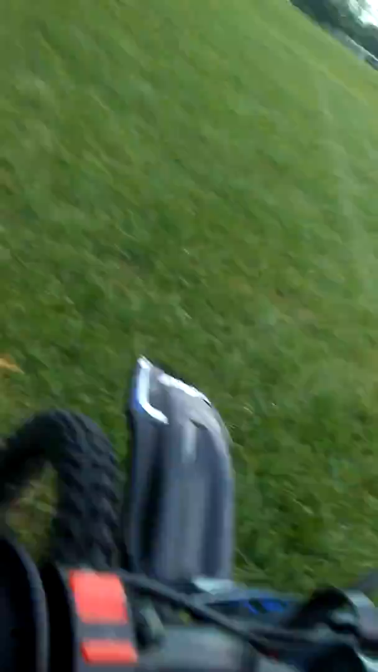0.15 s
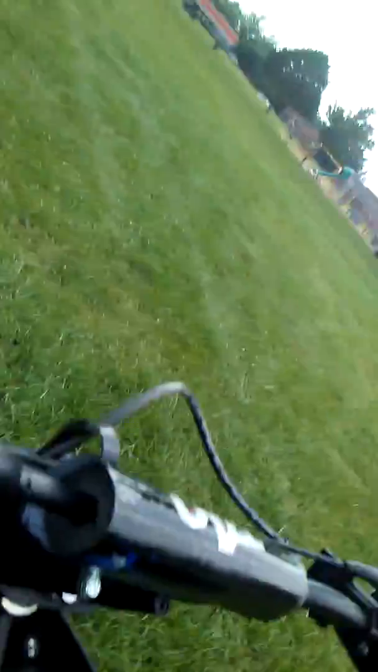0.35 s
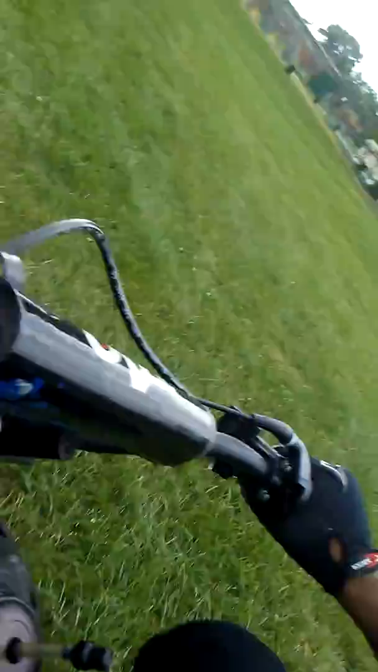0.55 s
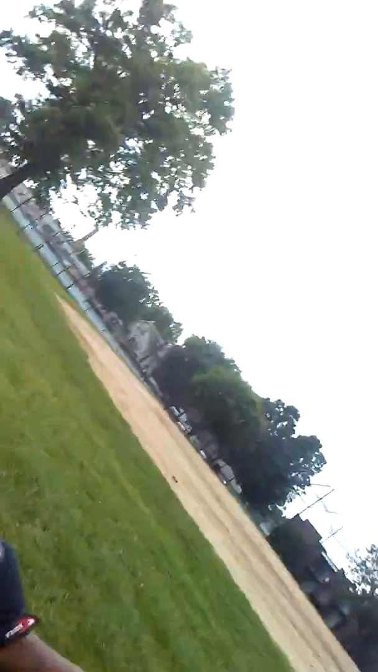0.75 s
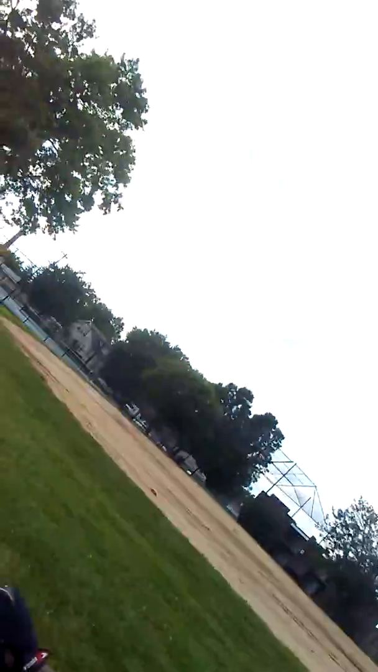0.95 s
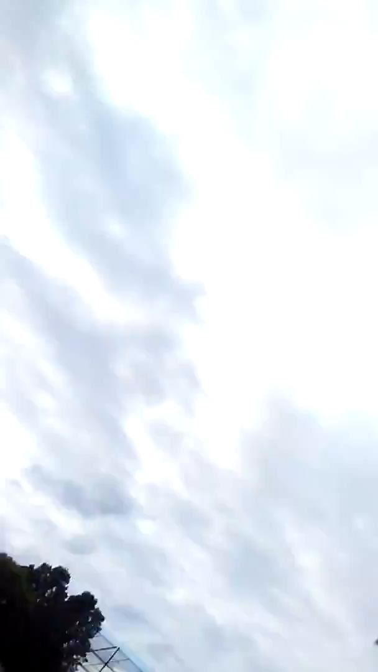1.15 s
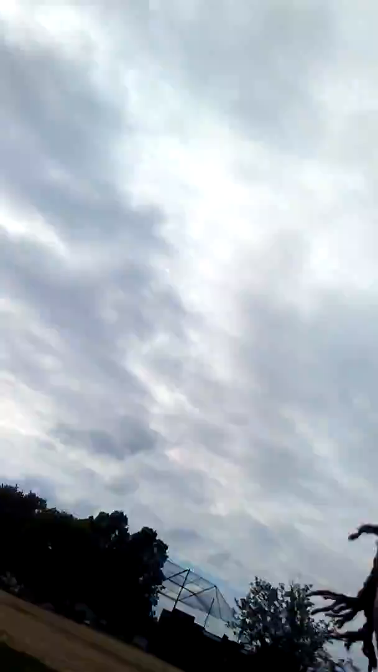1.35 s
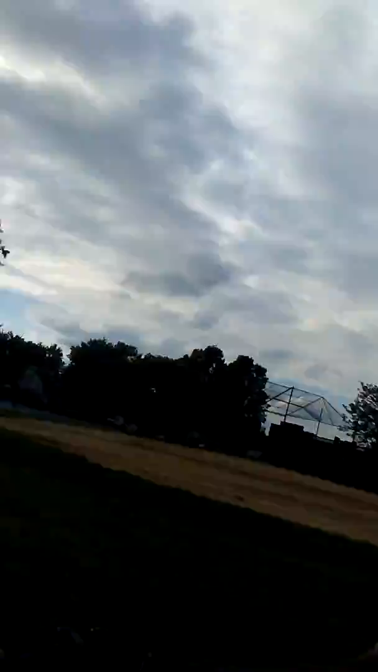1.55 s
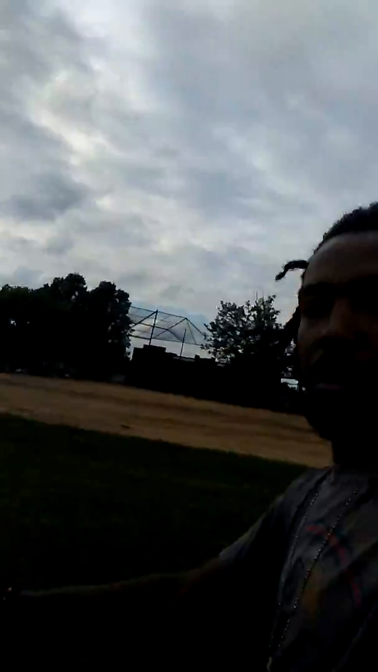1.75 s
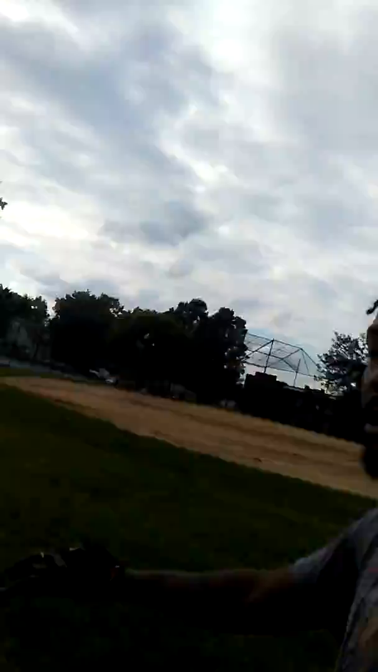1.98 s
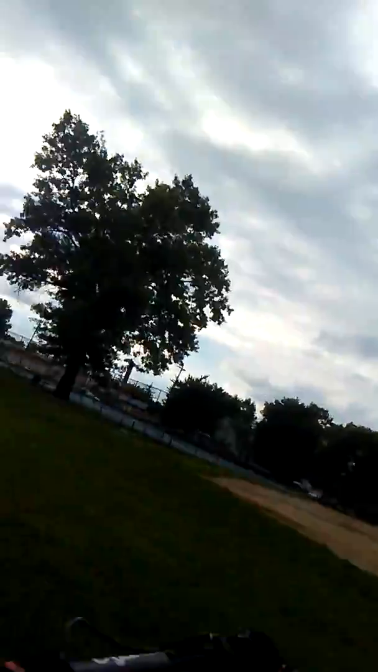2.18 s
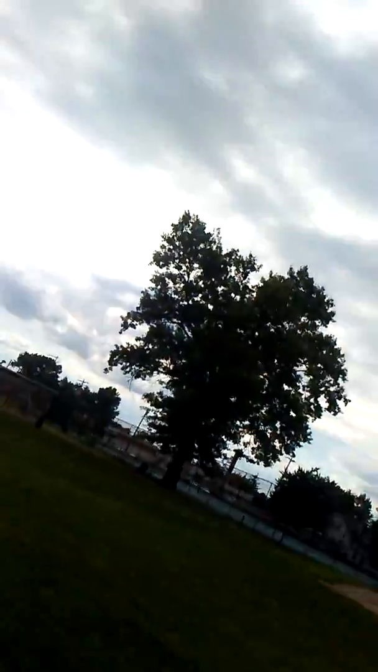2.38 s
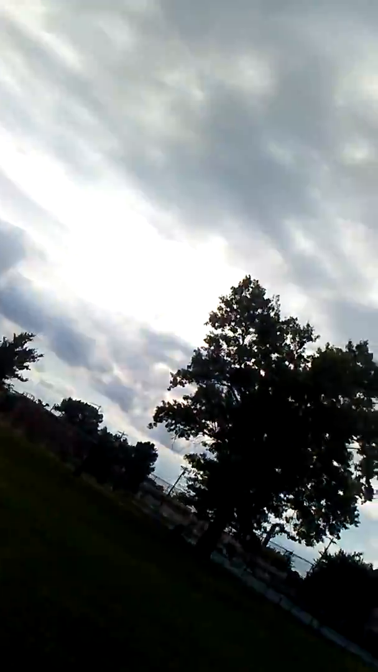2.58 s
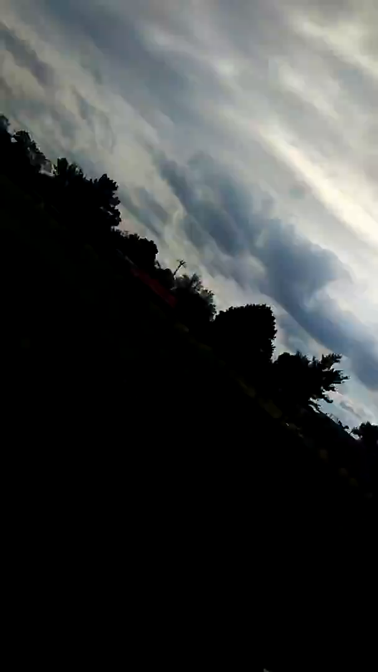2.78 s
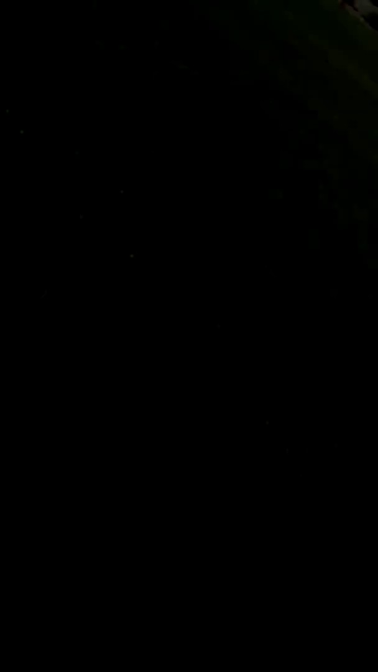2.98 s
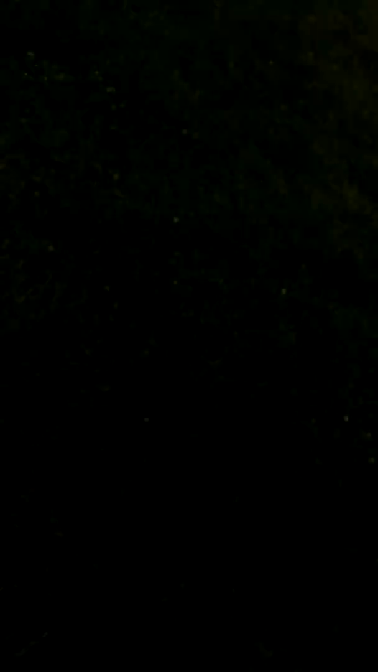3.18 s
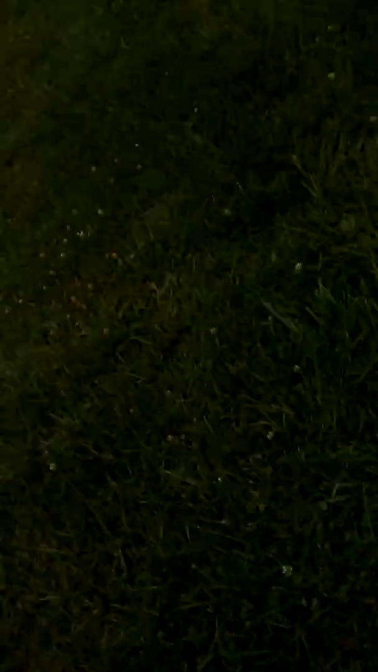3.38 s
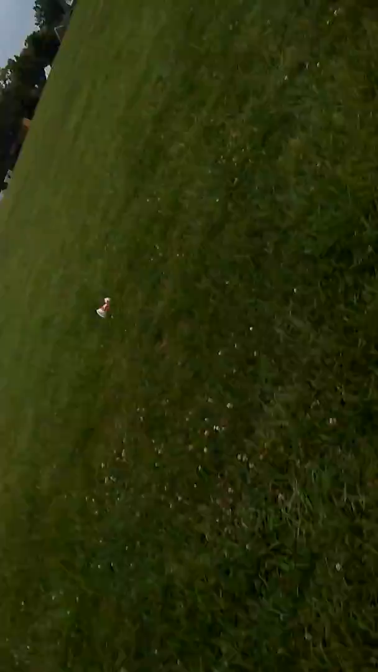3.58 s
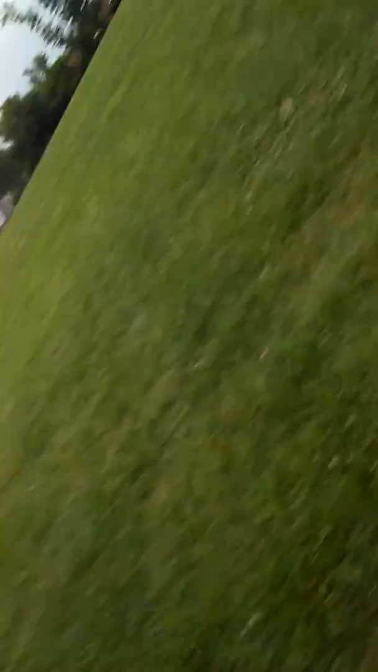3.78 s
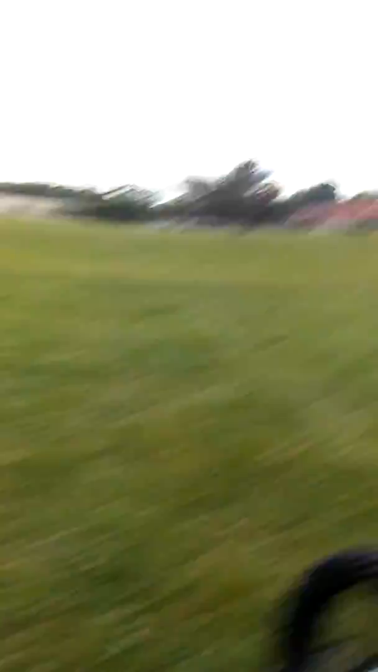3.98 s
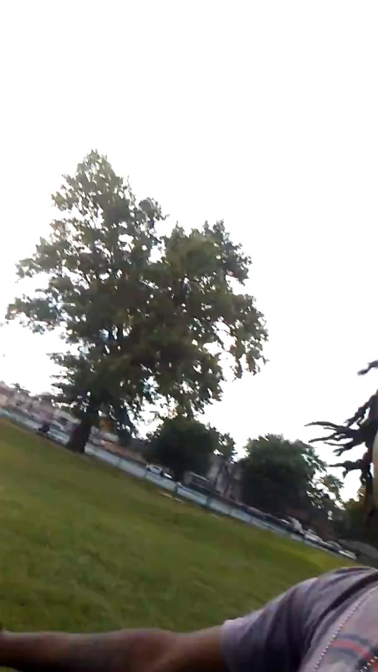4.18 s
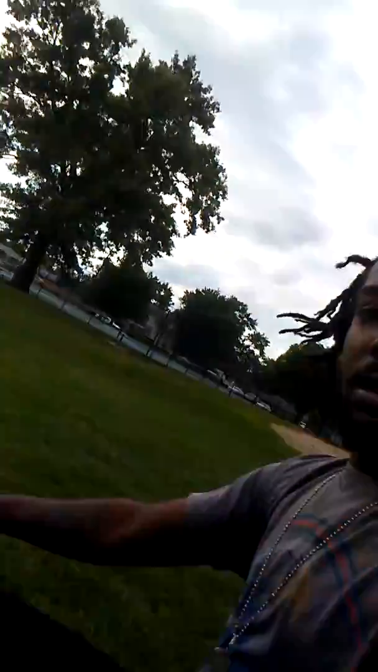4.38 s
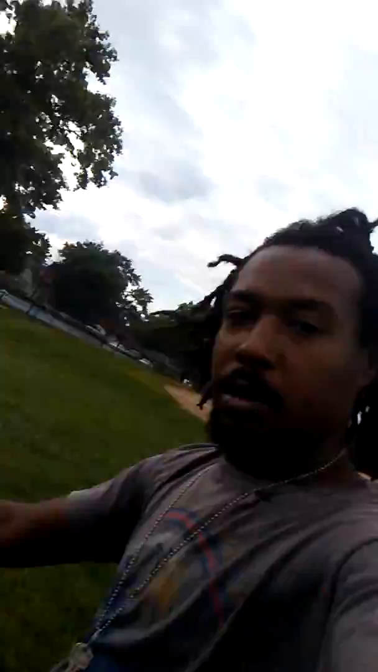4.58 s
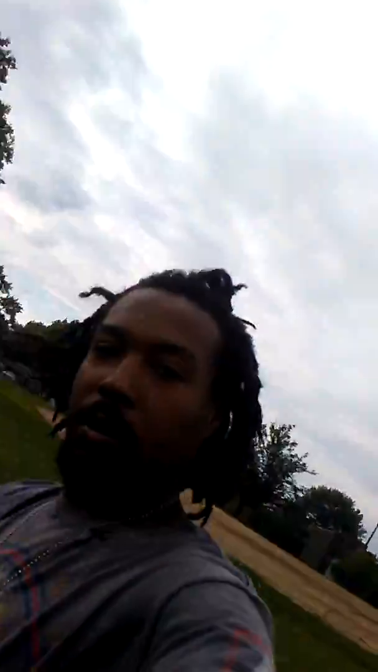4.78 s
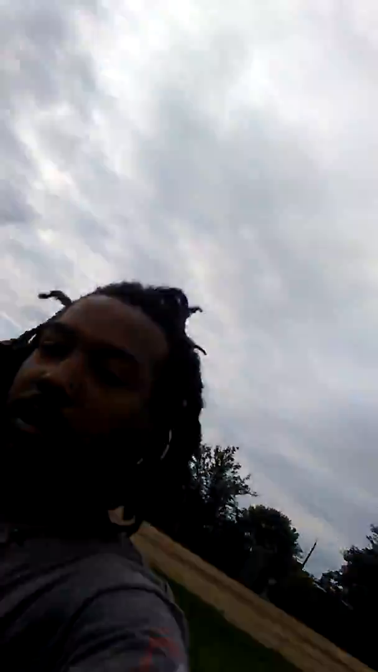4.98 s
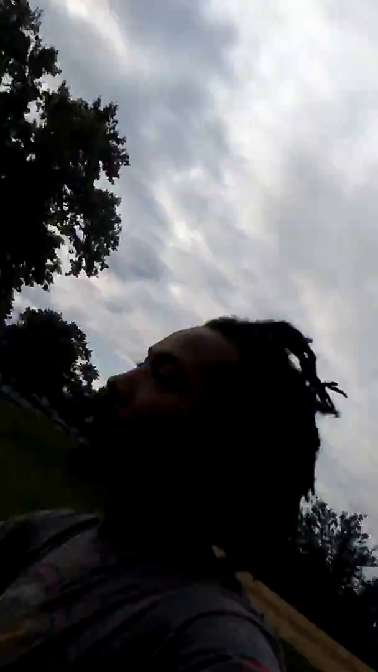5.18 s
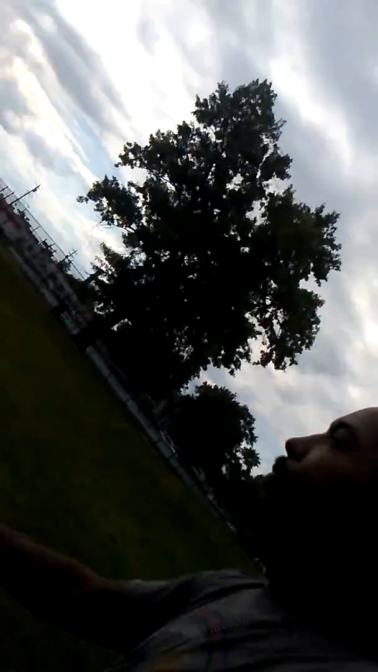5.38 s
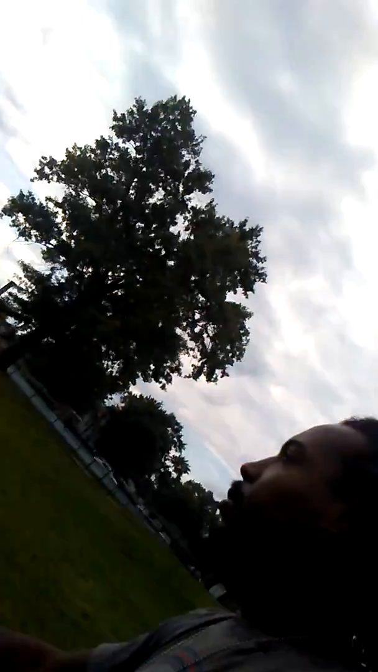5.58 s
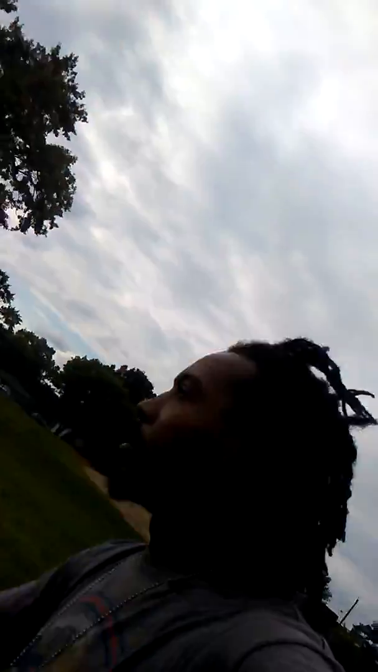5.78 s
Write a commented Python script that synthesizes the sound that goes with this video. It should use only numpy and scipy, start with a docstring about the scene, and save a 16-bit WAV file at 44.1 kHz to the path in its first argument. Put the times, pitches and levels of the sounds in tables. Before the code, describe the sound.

A single-cylinder quad bike chugs near idle, then picks up speed across a grass field, with handling knocks and growing wind gusts on the microphone.

```python
"""A single-cylinder four-stroke quad bike crosses a grass field, heard from the rider's hand.
It chugs near idle, then picks up speed: each firing excites the odd quarter-wave notes of the exhaust pipe.
Gas turbulence follows each puff, the intake hisses between firings, the casing clatters and the chain rasps.
Wind gusts rumble on the microphone, and the hand scuffs and knocks its case.
A fast limiter flattens the beats, and a faint modulated buzz rides on everything."""
import sys
import numpy as np
from scipy import signal
from scipy.fft import rfft, irfft, next_fast_len
from scipy.io import wavfile
from scipy.ndimage import uniform_filter1d

SR = 44100
rng = np.random.default_rng(int(sys.argv[2]) if len(sys.argv) > 2 else 0)


def transcribe(u):
    """Save the signal u as a 16-bit wav file named by the first command-line argument.

    u: samples, shape (n,) or (channels, n), limited to [-1, 1]; the rate is SR.
    q: integer samples, one column per channel.
    """
    v = np.clip(np.atleast_2d(u).T, -1, 1)
    q = np.round(v * 32767).astype(np.int16)
    wavfile.write(sys.argv[1], SR, q)


N = 257588
TIME = np.arange(N) / SR
IDLE_PER_S = 19  # firings per second
FIRST_FIRING_S, START_S = .5166, .527
EDGE_HZ = 15800  # upper band limit


def amp(db):
    """Level law: decibels to an amplitude ratio."""
    return 10 ** (np.asarray(db) / 20)


def evened(x):
    """Power normalisation: scales to rms 1."""
    return x / np.sqrt(np.mean(x ** 2) + 1e-20)


def curves(rows):
    """Linear interpolation: every column of a time table, at each sample."""
    s, *columns = np.transpose(rows)
    return [np.interp(TIME, s, column) for column in columns]


def read(points, hz):
    """Logarithmic pitch axis: a spectrum's value at hz, interpolated over log frequency."""
    f, value = np.transpose(points)
    return np.interp(np.log(hz + 1), np.log(f), value)


def add(mix, s, sound):
    """Superposition: mixes a sound in at s seconds."""
    part = mix[max(round(s * SR), 0):][:len(sound)]
    part += sound[:len(part)]


def coloured(x, points):
    """Linear filtering: multiplies the spectrum of x by a gain curve, then scales to rms 1."""
    size = next_fast_len(N)
    gain = amp(read(points, np.fft.rfftfreq(size, 1 / SR)))
    return evened(irfft(rfft(x, size) * gain, size)[:N])


def wander(hz):
    """Low-passed noise: a slow random drift of rms 1, with a Gaussian roll-off around hz."""
    size = next_fast_len(N)
    f = np.fft.rfftfreq(size, 1 / SR)
    return evened(irfft(rfft(rng.standard_normal(size)) * np.exp(-(f / hz) ** 2), size)[:N])


def grainy(rough_db, grain_hz):
    """Random amplitude modulation: white noise that comes in clumps."""
    return evened(rng.standard_normal(N) * amp(rough_db * wander(grain_hz)))


def stroke(turns, centre, width):
    """Cyclic excitation: a bump once per engine cycle; centre and width in cycles after the firing."""
    phase = (turns - centre + .5) % 1 - .5
    return np.exp(-.5 * (phase / width) ** 2)


def swell(s, length):
    """Gaussian envelope: a smooth rise and fall around s seconds."""
    return np.exp(-(2 * (TIME - s) / length) ** 2)


def octaves(speed):
    """Logarithmic speed: engine speed in octaves above idle."""
    return np.log2(speed / IDLE_PER_S)


def resonate(x, hz, width):
    """Heterodyne resonance: a two-pole low-pass, shifted to follow the curve hz; rms 1."""
    turn = np.exp(2j * np.pi * np.cumsum(hz) / SR)
    r = np.exp(-np.pi * width / SR)
    return evened((turn * signal.lfilter([1], np.poly([r, r]), x / turn)).real)


def air(points, centre_hz, width, focus):
    """Turbulent noise: broad hiss with one moving resonance standing out of it."""
    broad = coloured(grainy(rough_db=3.5, grain_hz=410), points)
    narrow = resonate(grainy(rough_db=6.5, grain_hz=197), centre_hz, width)
    return evened(broad + focus * narrow)


def exhaust(turns, speed, echo_s=0.004322, hot_echo_s=0.004026, reflection=0.88, hot_reflection=0.85,
            wall_hz=580, sweep=0.44, bloom_s=0.00436, bloom_hz=400, valve_hz=1200, bark_db=-9.0,
            bark_rev_db=-3.7, uneven_db=0.44, scatter_db=0.1, size=8192):
    """Quarter-wave resonance: each puff runs up and down the pipe, flipping at the open end."""
    # One puff through the muffler with its chamber resonances. Each row: frequency in Hz, relative level in dB.
    puff_colour = [(25, -20), (70, 36.5), (120, 41.5), (190, 41.5), (270, 52.5), (345, 43), (420, 55.5),
                   (510, 28.5), (620, 36.5), (730, 33), (860, 35.5), (1150, 25.5), (2000, -18.5),
                   (5000, -14)]
    # Pipe's lowest note, changing as the hand moves about. Each row: time in seconds, relative level in dB.
    boom = [(.53, -2), (1.0, 1), (1.45, -1.2), (1.75, -9), (2.15, -5.5), (2.6, -8), (3.0, 1), (3.3, 2.5),
            (3.6, -1.5), (4.7, 4), (5.5, 1), (5.84, 4.5)]
    # How far the muffler's honk stands out. Each row: time in seconds, level in dB before its share.
    honk_level = [(.53, 1.5), (1.75, -10), (2.2, -3.5), (3.0, -5), (3.65, 9.5), (4.0, 5), (5.1, -4.5),
                  (5.84, 11)]
    # Resonances of the honk. Each row: centre in Hz, half-width in Hz, multiplier of the honk level in dB.
    honk_modes = [(716, 17, 1.57), (884, 67, 1.54)]
    hz, out = np.fft.rfftfreq(size, 1 / SR), np.zeros(N)
    (boom_db,), (honk_db,) = curves(boom), curves(honk_level)
    revs = (speed - speed.min()) / np.ptp(speed)  # 0 slowest, 1 fastest
    firings = np.flatnonzero((np.diff(np.floor(turns)) > 0) & (turns[1:] >= 0))
    chance = rng.standard_normal((len(firings), len(puff_colour) + 1))
    upper = hz ** 2 / (hz ** 2 + 200 ** 2)  # weight of the notes above the boom
    honk = sum(share / (1 + ((hz - centre) / width) ** 2) for centre, width, share in honk_modes)
    # The valve lifts gradually, rounding the front
    lead_s = .001
    opening = np.exp(-(hz / valve_hz) ** 2 - 2j * np.pi * hz * lead_s)
    # The muffler holds back the upper notes: each chug sweeps upward
    lag = bloom_s * hz ** 6 / (hz ** 6 + bloom_hz ** 6)
    opening = opening * np.exp(-2j * np.pi * np.cumsum(lag) * hz[1])
    for i, (strength, *scatter) in zip(firings, chance):
        colour = np.add(puff_colour, np.outer(scatter, [0, scatter_db]))  # no two burns are alike
        db = read(colour, hz) + uneven_db * strength + honk_db[i] * honk
        db = db + boom_db[i] * (1 - upper) + (bark_db + bark_rev_db * revs[i]) * upper
        # Minimum phase is causal: the muffler rings after the front
        log_gain = np.log(amp(np.r_[db, db[-2:0:-1]]))
        puff = -np.exp(np.conj(signal.hilbert(log_gain)))[:len(hz)]
        # Hot, fast gas shortens and damps the round trip
        heat = revs[i] ** 3
        delay = echo_s + (hot_echo_s - echo_s) * heat
        back = reflection + (hot_reflection - reflection) * heat
        echo = back * np.exp(-(hz / wall_hz) ** 2 - 2j * np.pi * hz * delay)
        # At low revs the rising piston pushes out a second puff, two round trips later
        second = sweep * (1 - heat) * upper * np.exp(-4j * np.pi * hz * delay)
        add(out, i / SR - lead_s, irfft(opening * puff * (1 + second) / (1 + echo)))
    return out


def intake(turns, snap=0.76, leak=.13, uneven_db=.5):
    """Flow noise: air hisses past the throttle in a spurt as the valve opens, and a peak near full lift."""
    # How strongly the intake gulps once a cycle. Each row: time in seconds, share from 0 to 1.
    throttle = [(.5, 0), (2.5, 0), (3.2, 0.28), (3.6, 0.36), (4.8, 0.62), (5.2, 0.23), (5.8, 0.45)]
    # Level and pitch of the hiss, changing as the hand turns. Each row: time in seconds, level in dB, centre in Hz.
    hiss_band = [(.55, -40, 5600), (1.2, -37, 5600), (1.5, -28, 5430), (1.64, -40.5, 5870),
                 (2.6, -38, 6680), (2.85, -35, 5350), (3.4, -25, 5480), (3.95, -32, 5300),
                 (4.18, -22.5, 6650), (4.3, -31.5, 5850), (4.7, -23, 5680), (5.1, -25.5, 5380),
                 (5.62, -34.5, 5000), (5.84, -24.5, 5270)]
    # Level and pitch of the fizz above it. Each row: time in seconds, level in dB, centre in Hz.
    fizz_band = [(.55, -40, 8300), (.85, -49, 8500), (1.2, -30.5, 9300), (1.5, -35, 9500),
                 (1.85, -31, 9000), (2.15, -39, 8000), (2.8, -31.5, 7300), (3.3, -34.5, 7670),
                 (3.55, -28, 10700), (4.0, -29, 10200), (4.2, -29.5, 8400), (4.75, -24.5, 9450),
                 (5.25, -34.5, 8070), (5.62, -36.5, 8400), (5.84, -27, 8800)]
    # Colour of the hiss. Each row: frequency in Hz, relative level in dB.
    hiss_colour = [(3000, -12), (4300, 10), (5100, 14), (6000, 17), (6900, 13.5), (7700, 4), (9500, -24)]
    # Colour of the fizz. Each row: frequency in Hz, relative level in dB.
    fizz_colour = [(5500, -11.5), (7300, 5), (8400, 9.5), (9600, 4.5), (10800, 2), (12200, 1.5),
                   (13500, -25), (16000, -31)]
    share = np.clip(curves(throttle)[0], 0, 1)
    peaks = stroke(turns, centre=0.4, width=0.044) + stroke(turns, centre=0.69, width=0.078)
    gulp = stroke(turns, centre=0.58, width=0.094) + snap * peaks
    gate = evened(1 - share + share * (leak + gulp * amp(uneven_db * wander(27))))
    gate /= np.sqrt(uniform_filter1d(gate ** 2, size=8000))  # gulping keeps the average power steady
    (hiss_db, hiss_hz), (fizz_db, fizz_hz) = curves(hiss_band), curves(fizz_band)
    hiss = amp(hiss_db) * air(hiss_colour, hiss_hz, width=660, focus=0.77)
    fizz = amp(fizz_db) * air(fizz_colour, fizz_hz, width=1700, focus=0.7)
    return gate * (hiss + fizz)


def clatter(turns, speed, per_octave_db=10, valve=0.33):
    """Forced resonance: valve gear rattles the casing, louder with speed and hardest as the valves seat."""
    # Ringing of the engine casing. Each row: frequency in Hz, bandwidth in Hz, relative level in dB.
    casing = [(1060, 850, 7), (1482, 106, 7), (1754, 42, 7.5), (2225, 260, -2), (1540, 2000, -18)]
    # Clatter at idle speed, lower while the hand is turned away. Each row: time in seconds, level in dB.
    casing_level = [(.55, -32), (1.45, -29.5), (1.8, -36.5), (2.4, -33.5), (2.9, -31), (3.6, -31.5),
                    (5.84, -31)]
    seats = stroke(turns, centre=1.0, width=0.0083) + stroke(turns, centre=0.91, width=0.016)
    drive = grainy(rough_db=3.0, grain_hz=372) * (1 + valve * seats)
    ring = np.zeros(N)
    for hz, width, db in casing:
        ring += amp(db) * signal.lfilter(*signal.iirpeak(hz, hz / width, SR), drive)
    return amp(curves(casing_level)[0] + per_octave_db * octaves(speed)) * evened(ring)


def gas_rush(turns, speed, idle_db=-28.5, per_octave_db=13, between=0.33):
    """Jet noise: turbulence leaves the pipe with each puff, stronger with speed."""
    # Colour of the rush. Each row: frequency in Hz, relative level in dB.
    rush = [(150, -37), (400, 0), (720, -3), (950, -13), (1300, -20), (2500, -35)]
    gate = evened(between + stroke(turns, centre=.25, width=.12))
    level = amp(idle_db + per_octave_db * octaves(speed))
    return level * gate * coloured(rng.standard_normal(N), rush)


def chain(turns, tug=0.59, loose_db=2.5):
    """Friction noise: the chain rasps unevenly, tugged once per engine cycle."""
    # Strength of the rasp. Each row: time in seconds, level in dB.
    rasp_level = [(.85, -47), (1.4, -29), (1.95, -39), (2.4, -32.5), (2.7, -39.5), (3.3, -36), (4.15, -62),
                  (4.35, -29), (4.65, -55), (4.95, -35), (5.84, -32)]
    # Colour of the rasp. Each row: frequency in Hz, relative level in dB.
    rasp = [(1500, -28), (2400, -5.5), (2800, 17), (3150, 10.5), (3600, 7), (4400, 0), (5500, -8.5)]
    pull = 1 + tug * stroke(turns, centre=0.63, width=0.21)
    gate = evened(pull * amp(loose_db * wander(22)))
    return amp(curves(rasp_level)[0]) * gate * coloured(grainy(rough_db=6.0, grain_hz=296), rasp)


def scuffs():
    """Friction noise: short grainy rubs of skin on the microphone's case."""
    # The hand's rubs. Each row: time of the peak in seconds, length in seconds, level in dB.
    rubs = [(0.928, 0.058, -26.5), (1.033, 0.029, -29.5), (1.144, 0.016, -22), (3.07, 0.12, -26),
            (5.801, 0.036, -19.5)]
    # Colour of skin on the case. Each row: frequency in Hz, relative level in dB.
    skin = [(600, -16), (1500, -1), (2800, 3), (5500, -1.5), (8000, -7), (14000, -21)]
    level = sum(amp(db) * swell(s, length) for s, length, db in rubs)
    return level * coloured(grainy(rough_db=6, grain_hz=500), skin)


def knocks(crack=3.3, crack_s=0.0024, size=3000):
    """Impulse response: a tap gives a short noise crack and the decaying modes of the case."""
    # Taps of the hand. Each row: time in seconds, peak in dB ahead of the limiter, ring tilt in dB per octave.
    taps = [(0.5363, -8, -6), (0.551, 1.5, -7), (0.5847, -10.5, 5), (1.326, -7, 36), (1.3525, 9, -3),
            (3.062, 3, 17), (5.5939, 9, 4)]
    # Modes of the case. Each row: frequency in Hz, level in dB before the tilt, time to fall 60 dB in seconds.
    modes = [(1950, -5, 0.0045), (2580, 29, 0.0082), (3370, 22, 0.011), (4100, 23.5, 0.023),
             (4650, 20, 0.011), (7160, 6, 0.0087)]
    t, out = np.arange(size) / SR, np.zeros(N)
    for s, peak_db, treble_db in taps:
        hit = crack * rng.standard_normal(size) * np.exp(-t / crack_s)
        for hz, db, t60 in modes:
            decay = amp(db + treble_db * np.log2(hz / 3000) - 60 * t / t60)
            hit += decay * np.sin(2 * np.pi * hz * t)
        add(out, s, amp(peak_db) * hit / abs(hit).max())
    return out


def wind(speed, rumble_db=-26, rumble_per_octave_db=2, buffet_db=-40, buffet_per_octave_db=30):
    """Turbulent pressure: lumpy eddies on the microphone grow with speed; gusts swell over them."""
    # Colour of the steady rumble. Each row: frequency in Hz, relative level in dB.
    rumble_colour = [(12, -8), (30, -7), (55, 10.5), (90, 11), (200, 0), (600, -31), (2000, -70)]
    # Colour of the buffeting. Each row: frequency in Hz, relative level in dB.
    buffet_colour = [(40, -2), (120, -1.5), (280, 10.5), (450, 10), (600, -8.5), (1000, -15.5), (2500, -58),
                     (6000, -64.5), (16000, -104)]
    # Colour of a gust's low thump. Each row: frequency in Hz, relative level in dB.
    thump_colour = [(15, -19), (35, 4), (55, 3), (90, -0.5), (200, -25), (800, -62)]
    # Gusts. Each row: time of the peak in seconds, length in seconds, thump level in dB,
    # buffeting level in dB, treble tilt of the buffeting in dB per octave.
    gusts = [(4.306, 0.079, -23, -11.5, -4), (4.52, 0.11, -15, -16, -3), (5.144, 0.12, -19, -13.5, 5),
             (5.311, 0.055, -18, -7.5, 0.5), (5.393, 0.075, -12, -7, 5.5), (5.47, 0.066, -32, -7.5, 2),
             (5.564, 0.14, -14.5, -11, -4), (5.665, 0.055, -15, -6, 10), (5.8, 0.18, -15, -9, 2)]
    rumble = coloured(grainy(rough_db=0.0, grain_hz=4), rumble_colour)
    eddies = grainy(rough_db=4.0, grain_hz=30.5)
    out = amp(rumble_db + rumble_per_octave_db * octaves(speed)) * rumble
    out += amp(buffet_db + buffet_per_octave_db * octaves(speed)) * coloured(eddies, buffet_colour)
    thump = coloured(rng.standard_normal(N), thump_colour)
    for s, length, low_db, mid_db, tilt_db in gusts:
        tilted = [(hz, db + tilt_db * np.log2(hz)) for hz, db in buffet_colour]
        out += swell(s, length) * (amp(low_db) * thump + amp(mid_db) * coloured(eddies, tilted))
    return out


def scene():
    """Phase locking: all engine sounds share one speed curve, and the cyclic ones one crankshaft phase."""
    # Engine speed. Each row: time in seconds, firings per second.
    speed_curve = [(0.5, 19.72), (0.98, 19.0), (1.08, 19.4), (1.71, 19.54), (1.94, 18.6), (2.73, 19.59),
                   (3.21, 21.17), (3.27, 20.45), (3.63, 23.95), (4.1, 26.22), (4.27, 24.53), (4.81, 27.86),
                   (5.19, 27.89), (5.28, 26.48), (5.66, 25.21), (5.84, 27.78)]
    speed, = curves(speed_curve)
    turns = np.cumsum(speed) / SR  # engine cycles, one firing each
    turns -= np.interp(FIRST_FIRING_S, TIME, turns)
    engine = exhaust(turns, speed) + intake(turns) + clatter(turns, speed)
    engine += gas_rush(turns, speed) + chain(turns)
    return (engine + scuffs() + knocks() + wind(speed))[None]


def record(dry, ceiling=0.69, recovery_db_per_s=450, attack_s=.00003, buzz_db=-43):
    """Gain reduction: peaks over the ceiling duck everything; then an abrupt start, a buzz and a band limit."""
    # Peak hold in dB that falls back at a steady rate
    fall = TIME * recovery_db_per_s
    peak_db = 20 * np.log10(abs(dry[0]) / ceiling + 1e-9)
    over_db = np.maximum(np.maximum.accumulate(peak_db + fall) - fall, 0)
    keep = np.exp(-1 / (attack_s * SR))
    duck_db = signal.lfilter([1 - keep], [1, -keep], over_db)
    limited = dry * amp(-duck_db) * (TIME >= START_S)
    # Amplitude modulation adds a faint, thin buzz that follows the sound
    carrier = np.cos(2 * np.pi * 5995 * TIME) + np.cos(2 * np.pi * 11990 * TIME)
    buzzing = limited * (1 + amp(buzz_db) * carrier)
    low_pass = signal.firwin(511, EDGE_HZ, window=("kaiser", 9), fs=SR)
    return signal.oaconvolve(buzzing, low_pass[None], "same")


dry = scene()
out = record(dry)
transcribe(out)
```